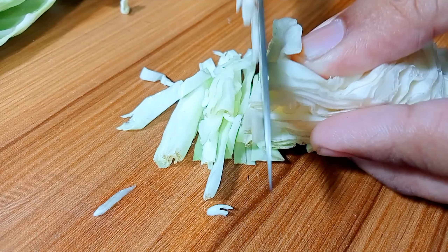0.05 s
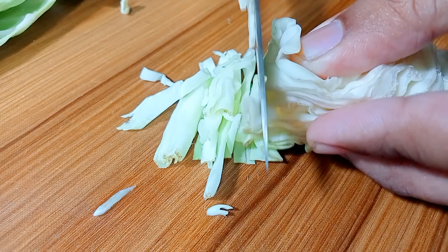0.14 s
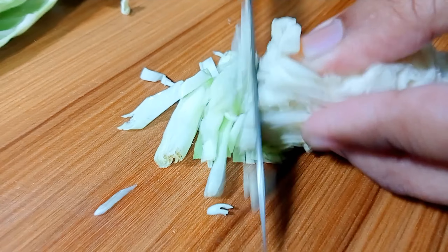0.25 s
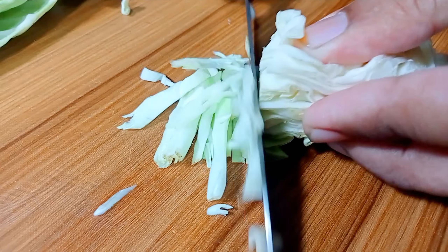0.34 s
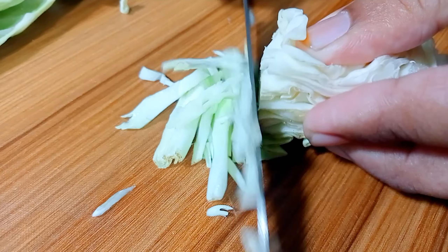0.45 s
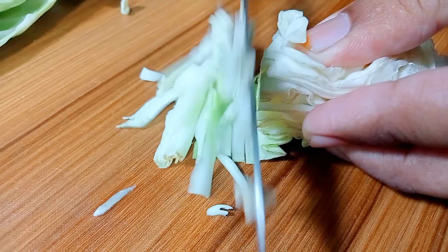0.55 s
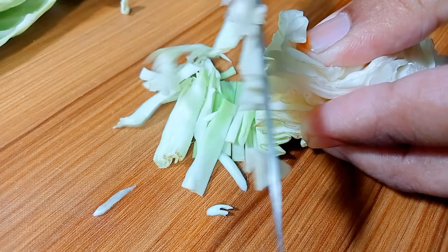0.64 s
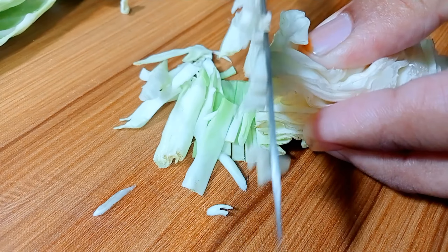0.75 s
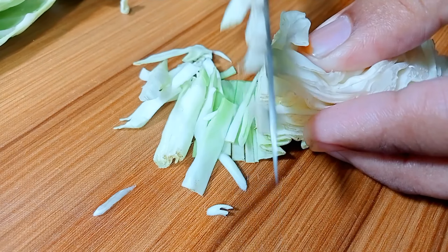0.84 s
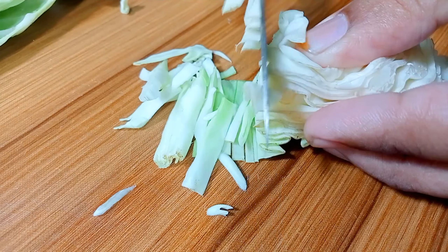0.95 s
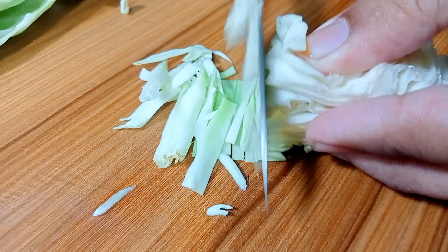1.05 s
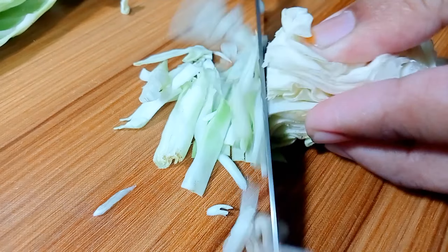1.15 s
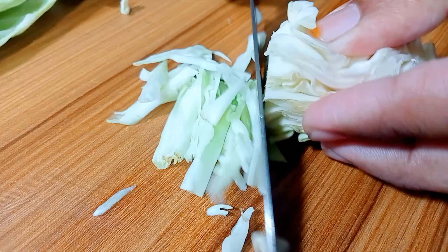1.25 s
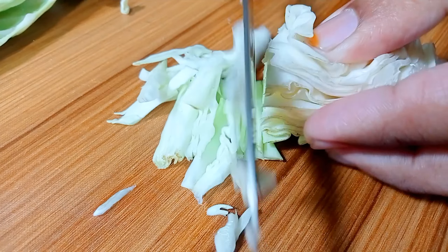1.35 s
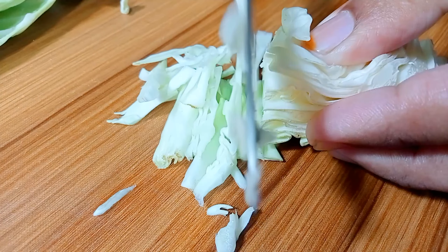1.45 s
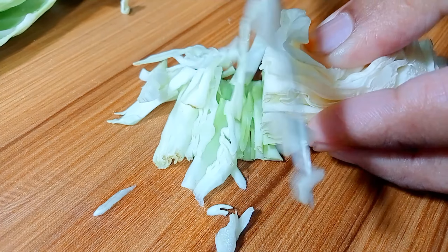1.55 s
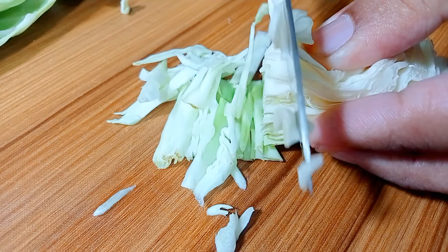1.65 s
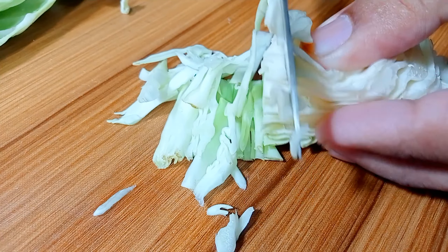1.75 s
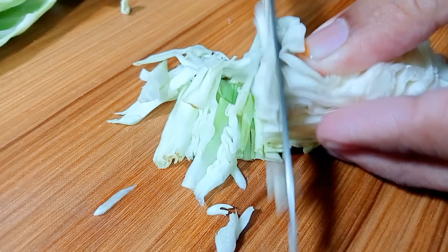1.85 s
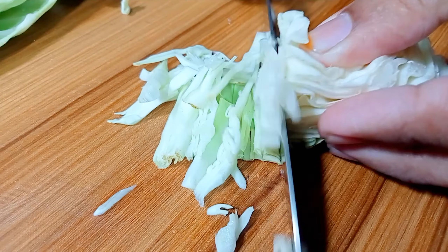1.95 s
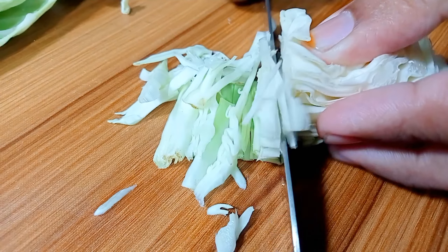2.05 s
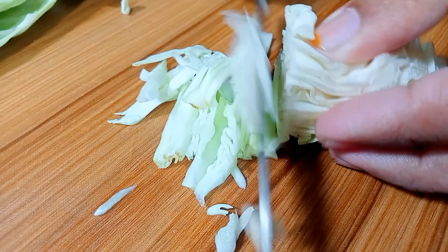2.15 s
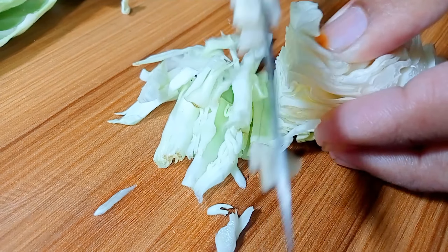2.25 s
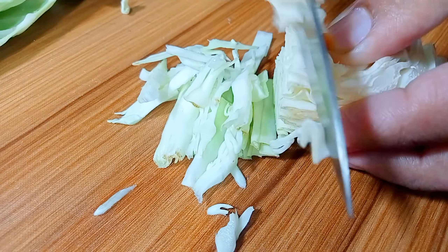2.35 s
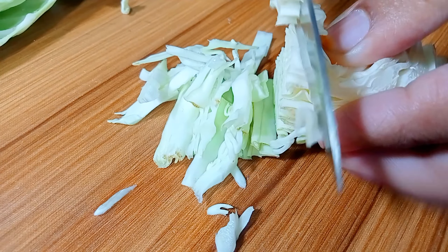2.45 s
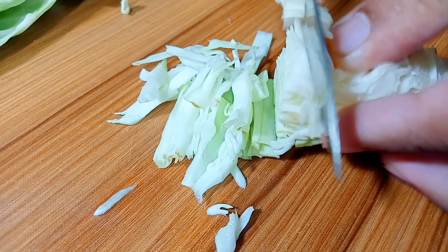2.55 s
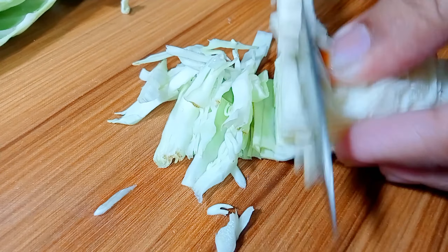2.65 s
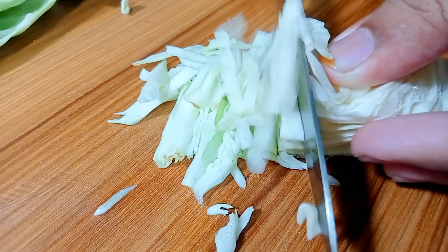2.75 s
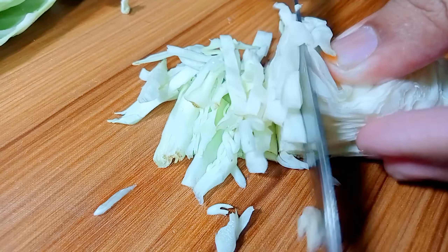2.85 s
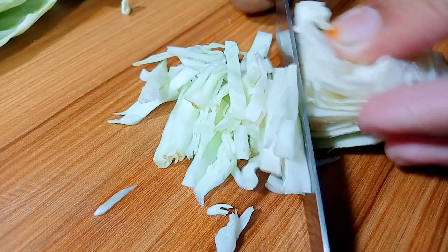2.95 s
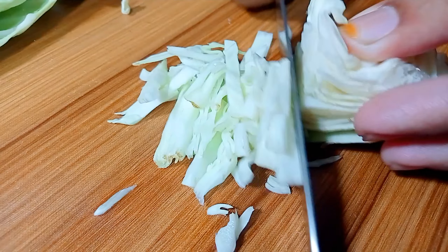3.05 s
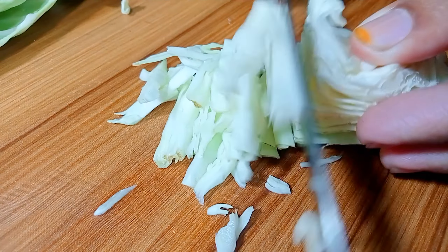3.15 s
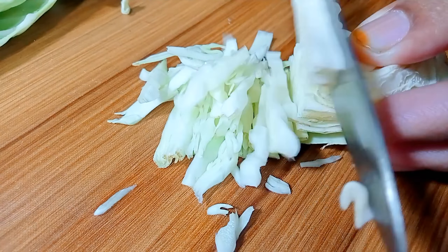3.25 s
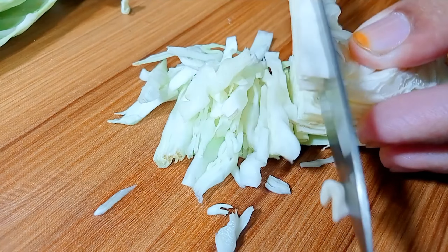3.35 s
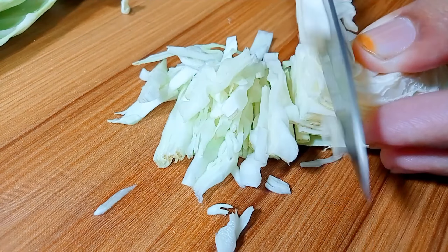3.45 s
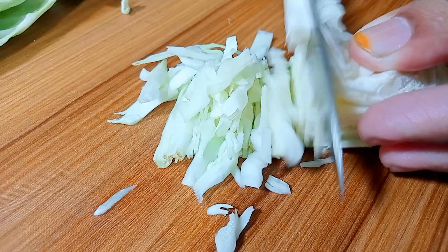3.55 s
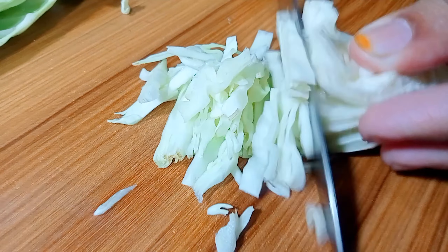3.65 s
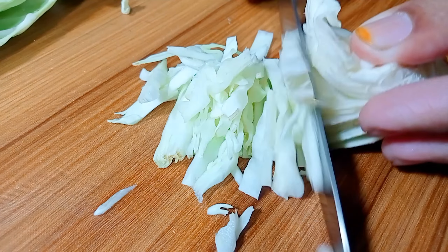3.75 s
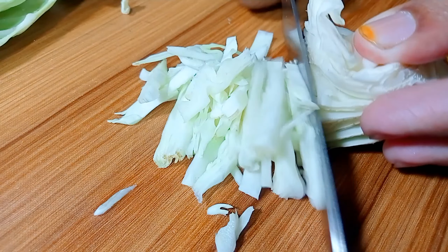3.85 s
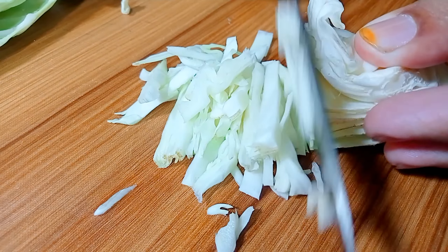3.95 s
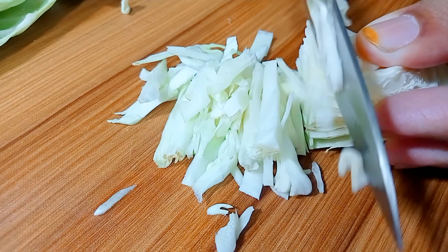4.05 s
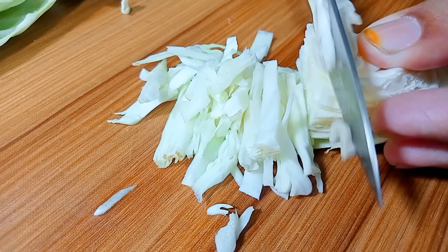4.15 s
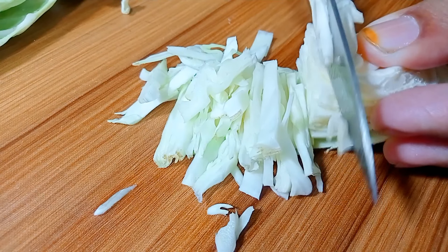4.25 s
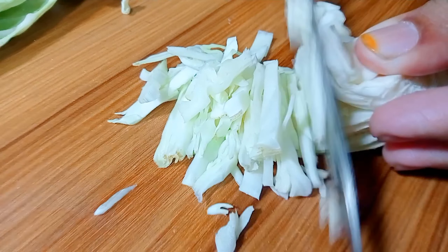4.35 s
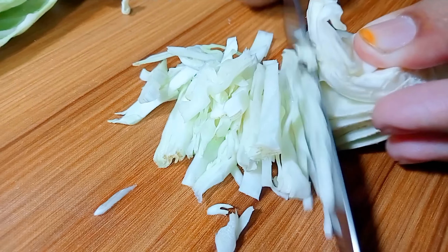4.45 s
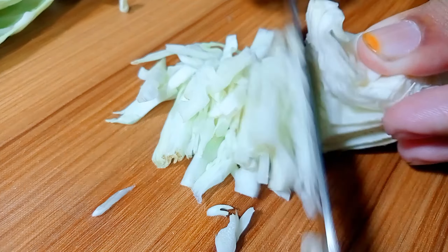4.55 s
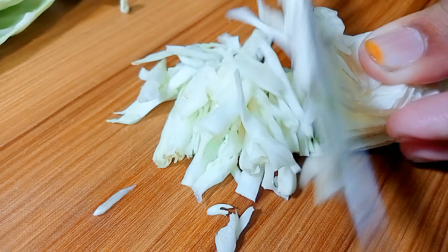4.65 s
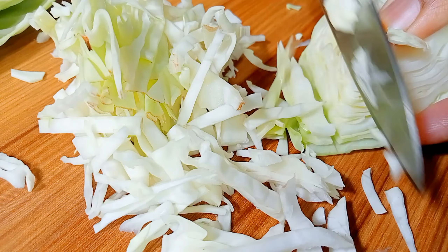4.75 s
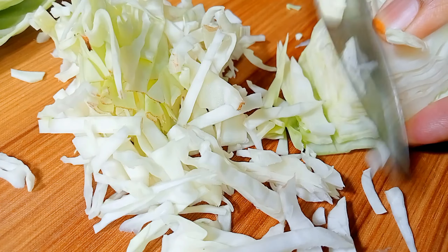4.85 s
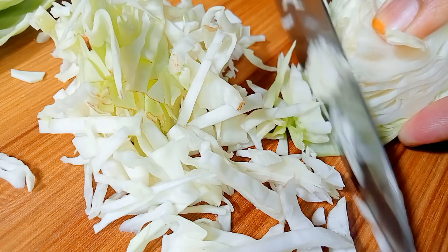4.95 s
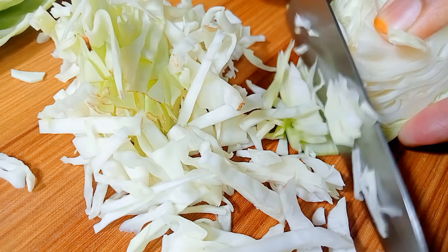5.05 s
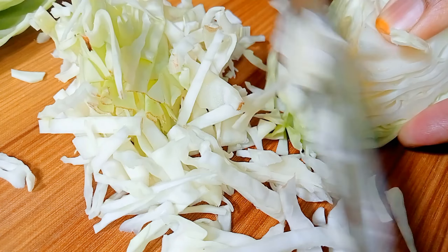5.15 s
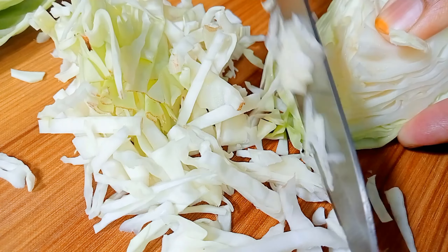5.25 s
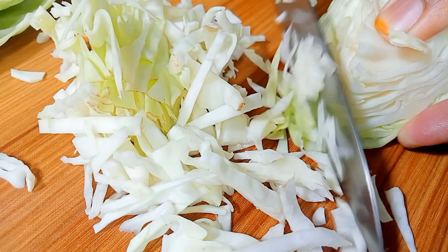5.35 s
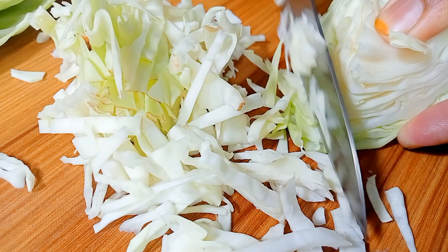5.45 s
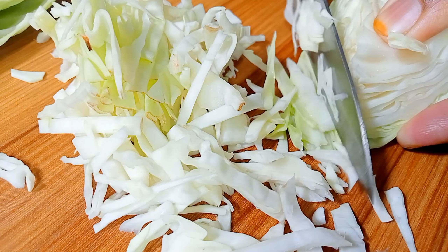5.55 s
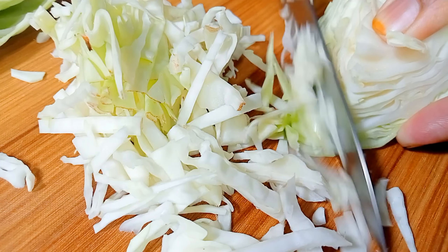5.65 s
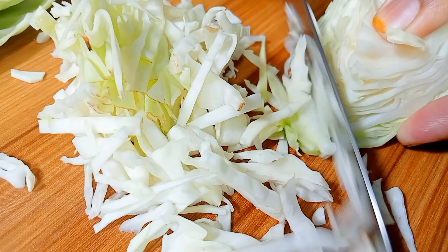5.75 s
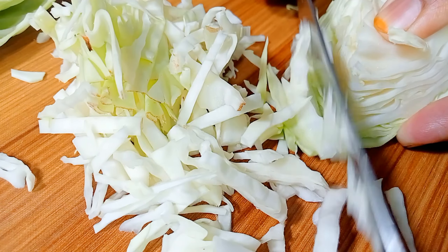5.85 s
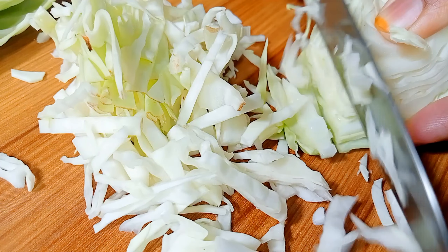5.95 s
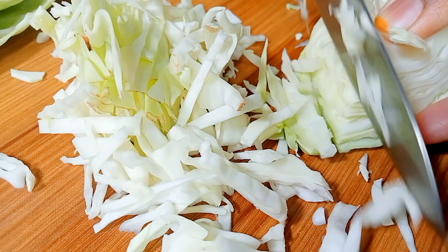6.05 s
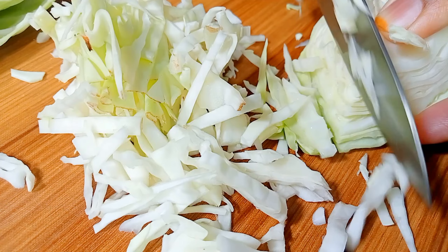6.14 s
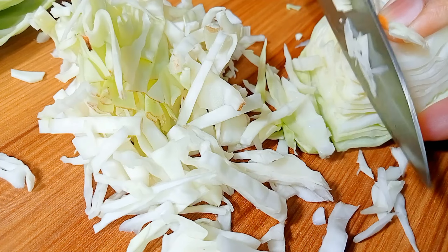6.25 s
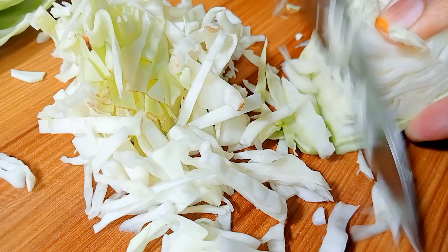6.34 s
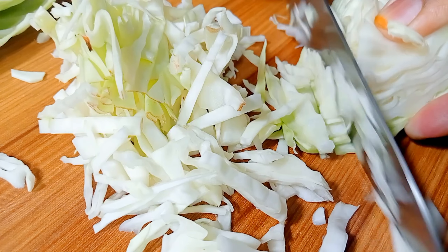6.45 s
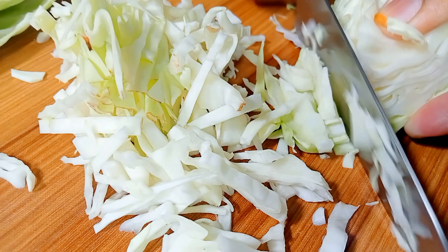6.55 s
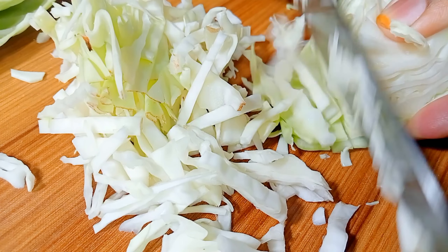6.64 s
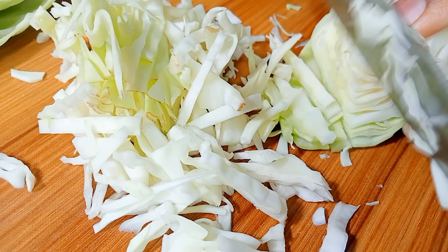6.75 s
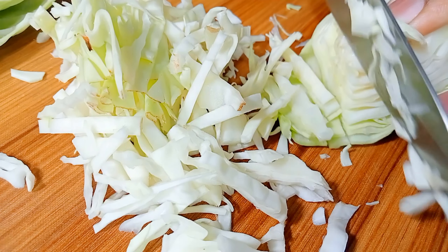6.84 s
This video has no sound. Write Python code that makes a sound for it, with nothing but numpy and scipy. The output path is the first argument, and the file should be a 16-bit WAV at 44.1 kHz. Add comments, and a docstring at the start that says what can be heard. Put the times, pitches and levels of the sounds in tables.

```python
"""In a small kitchen, close by, a knife shreds cabbage on a wooden board in eight strokes.
Each stroke crunches as a swarm of random fracture clicks, filtered into thud, push, crack and fizz.
Ribs snap as click runs, leaves rustle as sparse grains, and the wet blade squeaks by stick and slip.
Dull bumps of the cabbage and knocks of the edge are struck damped modes.
Synthetic room responses add reverberation, over faint wavering noise and one dry click."""
import sys
import numpy as np
from scipy import signal
from scipy.fft import rfft, irfft
from scipy.io import wavfile
from scipy.ndimage import uniform_filter1d

SR = 44100
rng = np.random.default_rng(int(sys.argv[2]) if len(sys.argv) > 2 else 0)


def master(y):
    """Save y as 16-bit WAV."""
    cut = np.clip(np.atleast_2d(y).T, -1, 1)
    pcm = np.round(cut * 32767)  # scale
    wavfile.write(sys.argv[1], SR, pcm.astype(np.int16))


N = 303849

# Levels marked rel_ are further scaled in the functions.
# Edge touches, bites, breaks the thickest rib, comes through; the third stroke sticks: three pushes.
# start_s, bite_delay_s, break_delay_s, length_s, rel_force_db, first_touch_db, board_weight_db,
# crispness_db, juice_db, rel_rib_snap_db, mean_leaf_pitch_hz
STROKES = [(0.6, 0.043, .064, 0.098, -23, -8, 2.5, 1, -1.2, -10, 3450),
           (1.411, 0.037, 0.098, 0.13, -22.5, -9.5, -1, 0.5, 0.1, 1.5, 3700),
           (2.197, 0.04, 0.085, .155, -30, -8, 3, 1.3, 0.6, -22.5, 3450),
           (2.413, 0.0031, 0.0071, 0.0098, -22.5, -10.5, 1.5, 4, 1, -6, 3460),
           (2.43, .007, .024, 0.038, -35.5, -13, 7, 9.5, 6, -19, 3320),
           (3.168, 0.012, .0755, 0.092, -22.5, -13.5, -2.5, 0.5, -1.9, -6.5, 3603),
           (3.88, 0.043, .0855, 0.097, -25, -9, 0.5, 3.1, -1.5, 0, 3420),
           (5.197, 0.0036, 0.0051, 0.028, -20.5, -8.5, 0, -4, -2, -6, 3390),
           (5.863, 0.046, 0.076, 0.11, -22, -11.5, -2.5, 0.6, 0.5, -4.5, 3300),
           (6.586, 0.033, 0.041, 0.079, -24.5, -8.5, -2, -2.5, -3, -9, 3250)]
# Force response of each crunch part: bite_db, growth_to_break_db, fall_after_break_db
THUD_FORCE = (-1.3, -2.5, -6.5)
PUSH_FORCE = (0, -1.1, -6.5)
CRACK_FORCE = (-1.2, 4.7, -8)
FIZZ_FORCE = (-9, 4.7, -5)
# Spectrum of the board's low thud: freq_hz, rel_density_db_per_hz
THUD_SPECTRUM = [(25, -31.5), (50, -12.5), (80, 0), (120, 1), (220, -5), (330, -19.5), (700, -45.5)]
# Spectrum of the push on the board: freq_hz, rel_density_db_per_hz
PUSH_SPECTRUM = [(60, -28.5), (200, -12.5), (320, 5), (420, 4), (560, 4.5), (720, -6), (860, -14),
                 (1200, -21), (2600, -67)]
# Spectrum of cracking leaf: freq_hz, rel_density_db_per_hz
CRACK_SPECTRUM = [(470, -42.5), (800, -13), (981, -3), (1050, -8), (1700, -10), (1920, -6), (2150, -8),
                  (2890, -1), (3600, -0.5), (4590, -15.5), (5200, -27.5), (6760, -51), (11400, -120)]
# Spectrum of bursting cells: freq_hz, rel_density_db_per_hz
FIZZ_SPECTRUM = [(2650, -52.5), (4500, -22.5), (5180, -15), (5870, -4.5), (6950, 1.5), (8270, -7),
                 (11000, -15), (12700, -15.5), (14900, -4.5), (15900, -23), (16500, -55)]
# Low board modes that the push keeps ringing: freq_hz, rel_level_db, t60_s
PLANK_MODES = [(150.15, -6, 0.46), (190, -5.5, 0.3), (282, -7.5, .14), (321, -7, 0.12), (544, -5.5, 0.0083),
               (700, -1, 0.093)]
# Single ribs and shreds snapping: start_s, rel_level_db
SNAPS = [(0.361, -36.5), (.600, -25), (0.755, -30), (0.7694, -18), (.783, -19), (0.7966, -17),
         (0.8625, -18), (0.87, -18.5), (1.386, -31.5), (1.455, -8), (1.685, -26.5), (1.722, -30.5),
         (2.3303, -5), (3.18, -9.5), (3.387, -28), (3.4313, -22), (3.908, -13), (3.9143, -11), (3.9287, -3),
         (4.1388, -25.5), (4.559, -33), (4.631, -34.5), (5.7954, -33), (6.595, -21)]
# Modes of a snapping rib: pitch_factor, rel_level_db, t60_s
RIB_MODES = [(.55, -28, .003), (.86, -15, .005), (1.03, 6, .006), (2.0, -2.5, .003), (2.25, -10, .003),
             (2.9, -21, .002), (4.3, -14, .002)]
# Blade and fingers brushing leaves: centre_s, half_length_s (to 1/e), rel_push_db, rel_crackle_db
BRUSHES = [(1.307, 0.021, -50.5, -56), (1.397, 0.011, -40, -44), (2.135, 0.027, -39, -47.5),
           (2.903, 0.012, -55.5, -53.5), (2.954, 0.025, -56, -54.5), (3.103, 0.021, -50, -43),
           (3.15, 0.013, -50, -46), (3.434, .005, -44, -39.5), (4.636, 0.025, -50.5, -59.5),
           (4.898, 0.011, -49.5, -42), (5.093, 0.023, -57, -50), (5.188, 0.01, -31, -35.5),
           (5.355, .02, -52, -50.5)]
# Wet steel on leaves, one table a squeak: time_s, mean_slips_per_s, rel_level_db
SQUEAKS = [
    [(.41, 620, -55), (.42, 600, -51.5), (.46, 630, -50.5), (.47, 700, -52), (.49, 550, -51),
     (.528, 370, -54), (.545, 38, -52)],
    [(4.318, 310, -49), (4.333, 298, -53), (4.35, 290, -45.5), (4.385, 282, -56)],
    [(6.40, 148, -64), (6.437, 137, -48.5), (6.48, 147, -40), (6.525, 118, -52)],
]
# Modes excited by each squeak: freq_hz, rel_level_db, t60_s
SQUEAK_MODES = [
    [(1340, -1, 0.0048), (1900, -3.5, 0.0053), (2490, -6.5, .008)],
    [(298, 1, 0.011), (1450, -8, 0.015), (2444, -8.5, 0.012), (2950, -7, 0.0045), (5850, -17, 0.01)],
    [(685, 19.5, 0.0029), (3050, 12, 0.0065), (3350, 9, 0.0091)],
]
# Cabbage giving way or bumping the board: start_s, rel_peak_db, ring_hz
BUMPS = [(.658, -7, 404), (1.421, -13.5, 532), (2.233, -11, 337), (3.152, -27, 339), (3.428, -24, 551),
         (5.169, -17.5, 453), (5.202, -6.5, 490), (5.914, -15.5, 700), (6.623, -6, 509),
         (6.819, -24.5, 850)]
# Modes of the bumped head: pitch_factor, rel_level_db, t60_s
HEAD_MODES = [(.35, -19.5, 0.023), (.8, -10, 0.015), (1.15, 5.5, 0.0051), (2.4, -4.5, 0.0043)]
# Edge landing on the board: start_s, peak_db (direct), hardness_db_per_octave, rel_room_db
KNOCKS = [(0.694, -11, 11, -8), (1.5409, -1.5, 1, -10.5), (2.455, -1.5, 5.5, -3), (3.2657, 0, 2, -10),
          (3.9733, -2, 1, -9.5), (5.22, -9.5, 1.5, -3), (5.96, -1.5, 1.5, -12), (6.660, 1, 5.5, -10.5)]
# Modes of board and blade together: freq_hz, rel_level_db, t60_s
BOARD_MODES = [(159, -28, 0.1), (464, -9.5, 0.01), (532, -13, 0.015), (1150, -31, .008), (1580, 5, 0.0079),
               (1870, -9, 0.018), (2520, -6, 0.0096), (2870, -2.5, 0.0039), (7100, -22, 0.0047)]
# Room colour for knocks: freq_hz, rel_room_db
KNOCK_ROOM = [(150, -4.5), (500, -5), (900, 1.5), (1550, -4.5), (2000, -0.5), (3200, 4.5), (4500, -3),
              (12000, -0.5)]
# Room colour for cabbage sounds: freq_hz, room_db
CABBAGE_ROOM = [(70, -9.5), (160, -7.5), (400, -13.5), (800, -11.5), (1500, -4), (2600, -9.5), (3700, -16),
                (7000, -11.5), (15000, -12.5)]
# Kitchen decay: freq_hz, t60_s
ROOM_T60 = [(100, 0.5), (500, 0.44), (2000, 0.45), (15000, 0.4)]
# Background noise spectrum: freq_hz, rel_density_db_per_hz
FLOOR_SPECTRUM = [(25, -24), (65, 0), (150, -13), (450, -15), (1250, -25), (3700, -23.5), (5100, -41),
                  (7000, -33), (11000, -40.5), (15500, -43.5)]
# Earlier stroke still ringing in the room: start_s, tail_peak_db
EARLIER_STROKE = (-0.038, -28.5)
# Short click without room: centre_s, dull_db, sharp_db
DRY_CLICK = (4.6905, -30, -31)

SLACK_SHARE, SLACK_DB = 0.5, -3.5  # slackening after the outer leaf splits, on the way to the bite
CREAK_DB = -11.5  # soft creaking leads into each stroke and lingers briefly after it
LEAF_RING_WIDTH_HZ = 280
SNAP_JUICE_DB, SNAP_PUSH_DB = -17, -16  # a snap also spits juice and jolts the board
FLOOR_DB = -62
BAND_LIMIT_HZ = 15800


def crunch(ring_share=0.4, cell_share=0.55):
    """Fractures push on the board, crack the leaf and burst sprays of small cells."""
    starts_s, *_, weight_db, crisp_db, juice_db, _, leaf_hz = np.transpose(STROKES)
    thud_gain = pressure(THUD_FORCE, weight_db)
    push_gain = pressure(PUSH_FORCE, np.zeros(len(STROKES)))
    crack_gain = pressure(CRACK_FORCE, crisp_db)
    fizz_gain = pressure(FIZZ_FORCE, juice_db)

    cracks = fractures(per_s=1000, spread_db=4)
    cells = fractures(per_s=6000, spread_db=3)
    # leaf after leaf: clumps a few ms long
    clumps = evened(amp(2.8 * drift(size=110)))
    drive = clumps * (np.sqrt(1 - cell_share) * cracks + np.sqrt(cell_share) * cells)

    low = through(cells * thud_gain, click(THUD_SPECTRUM))
    low = low + through(cracks * push_gain, click(PUSH_SPECTRUM))
    low = low + amp(-48) * through(low, ring(PLANK_MODES, size=12000))

    # pitch wanders as the edge passes from leaf to leaf
    pitch_hz = np.interp(np.arange(N) / SR, starts_s, leaf_hz) * (1 + 0.09 * drift(size=900))
    ringing = resonate(clumps * cells * crack_gain, pitch_hz, LEAF_RING_WIDTH_HZ)
    band = signal.butter(2, [2300, 4400], "band", fs=SR, output="sos")
    ringing = signal.sosfilt(band, ringing)
    dry_crack = through(drive * crack_gain, click(CRACK_SPECTRUM))
    crack = np.sqrt(1 - ring_share) * dry_crack + np.sqrt(ring_share) * ringing
    fizz = through(drive * fizz_gain, click(FIZZ_SPECTRUM))
    return low + crack + fizz


def pressure(shape, offsets_db, size=130, lead_size=1100):
    """Gain of one crunch part: rises to the bite, changes to the break, falls away."""
    bite_db, growth_db, fall_db = shape
    gain = np.zeros(N)
    for stroke, offset_db in zip(STROKES, offsets_db):
        start_s, bite_s, break_s, length_s, force_db, touch_db, *_ = stroke
        t = np.arange(N) / SR - start_s
        stages_s = np.sort([0, SLACK_SHARE * bite_s, bite_s, break_s, length_s])
        levels_db = [touch_db, touch_db / 2 + SLACK_DB, 0, growth_db, growth_db + fall_db]
        swell_db = np.interp(t, stages_s, levels_db)
        active = (t >= 0) * (t <= length_s)
        gain += amp(force_db + offset_db + bite_db + swell_db) * active
    lead = uniform_filter1d(uniform_filter1d(gain, lead_size), lead_size)
    return np.maximum(uniform_filter1d(gain, size), amp(CREAK_DB) * lead)


def fractures(per_s, spread_db, size=600):
    """Clicks of very uneven strength; the steady blade keeps their running power near 1."""
    strength = amp(spread_db * np.minimum(rng.exponential(1, N), 4)) * rng.choice([-1, 1], N)
    clicks = strength * (rng.random(N) < per_s / SR)
    power = uniform_filter1d(uniform_filter1d(clicks ** 2, size), size)
    return clicks / np.sqrt(abs(power) + 1e-4)


def snaps(size=400):
    """A rib breaks in a brief run of clicks; the thicker it is, the louder and longer it tears."""
    out, t = np.zeros(N), np.arange(size) / SR
    stroke_ribs = [(s + break_s, rib_db) for s, _, break_s, *_, rib_db, _ in STROKES]
    ribs = stroke_ribs + list(SNAPS)
    spill = amp(SNAP_JUICE_DB) * click(FIZZ_SPECTRUM) + amp(SNAP_PUSH_DB) * click(PUSH_SPECTRUM)
    for (start_s, db), tear in zip(ribs, rng.standard_normal((len(ribs), size))):
        pitch_hz = 3330 * (1 + 0.023 * tear[0])  # no two ribs ring quite alike
        u = t / (0.00029 + 0.00065 * amp(db))
        run = tear * u ** 2 * np.exp(-u)
        sound = np.convolve(run, ring(RIB_MODES, pitch_hz))
        add(out, start_s, amp(db + 9) * sound / np.linalg.norm(sound))
        add(out, start_s, amp(db + 7.5) * np.convolve(run / np.linalg.norm(run), spill))
    return out


def brushes():
    """Light touches break only a few cells; loose shreds tick as they settle."""
    t = np.arange(N) / SR
    push_gain, crackle_gain = np.zeros((2, N))
    for centre_s, half_s, push_db, crackle_db in BRUSHES:
        touch = np.exp(-abs((t - centre_s) / half_s) ** 1.3)
        push_gain += amp(push_db) * touch
        crackle_gain += amp(crackle_db) * touch
    grains = fractures(per_s=2700, spread_db=5.5)
    tick_db = -60.5 + 4 * np.minimum(rng.exponential(1, N), 4)
    settling = amp(tick_db) * (rng.random(N) < 22 / SR)  # 22 ticks per s
    sharp = grains * crackle_gain + settling
    dull = grains * push_gain
    low = through(dull, click(THUD_SPECTRUM)) + through(dull, click(PUSH_SPECTRUM))
    crack = through(sharp, click(CRACK_SPECTRUM))
    return low + crack + amp(-2.5) * through(sharp, click(FIZZ_SPECTRUM))


def squeaks(scrape_size=130):
    """Stick and slip: slightly uneven jerks, each with a short scrape, ring blade and leaf."""
    out = np.zeros(N)
    for rows, modes in zip(SQUEAKS, SQUEAK_MODES):
        time_s, rate, db = np.transpose(rows)
        t = np.arange(time_s[0], time_s[-1], 1 / SR)
        per_s = np.interp(t, time_s, rate)
        per_s = per_s * np.exp(14 / per_s * drift(size=150)[:len(t)])  # slow slips are the least even
        slips = np.diff(np.floor(np.cumsum(per_s) / SR), prepend=0)
        uneven, grit = rng.standard_normal((2, N))[:, :len(t)]
        slips = slips * np.sqrt(SR / per_s) * amp(np.interp(t, time_s, db) + 0.79 * uneven)
        scrape = grit * np.sqrt(abs(uniform_filter1d(slips ** 2, scrape_size)))
        scrape_share = np.clip(110 / per_s, 0, 0.85)  # slow slips slide far, fast ones ring clean
        drive = np.sqrt(1 - scrape_share) * slips + np.sqrt(scrape_share) * scrape
        body = ring(modes)
        juice = signal.fftconvolve(scrape, click(FIZZ_SPECTRUM))
        add(out, time_s[0], signal.fftconvolve(drive, body / np.linalg.norm(body)))
        add(out, time_s[0], amp(-16.5) * juice)
    return out


def bumps():
    """Dull blows of cabbage on board excite damped modes of the head."""
    out = np.zeros(N)
    for start_s, db, ring_hz in BUMPS:
        add(out, start_s, amp(db - 2) * ring(HEAD_MODES, ring_hz))
    return out


def knocks():
    """The edge hits the board, which radiates into the whole kitchen."""
    out = np.zeros(N)
    for start_s, peak_db, hardness_db, room_db in KNOCKS:
        blow = amp(peak_db) * ring(BOARD_MODES, tilt_db=hardness_db)
        add(out, start_s, blow)
        add(out, start_s, amp(room_db + 4) * signal.fftconvolve(blow, kitchen(KNOCK_ROOM)))
        add(out, start_s + 0.00057, amp(-12) * blow)  # off the counter top
        add(out, start_s + 0.0029, amp(-12.5) * blow)  # off the wall behind it
    return out


def reverberation(x, count=4):
    """Hand and blade move between strokes: the sound takes turns through several room responses."""
    starts_s = [s for s, *_ in STROKES]
    turn = np.searchsorted(starts_s, np.arange(N) / SR) % count
    return sum(through(x * (turn == k), kitchen(CABBAGE_ROOM)) for k in range(count))


def kitchen(colour, count=1600, size=20):
    """Room response: sparse taps of random sign, each band dying at its own speed."""
    taps = np.zeros(count * size)
    places = np.arange(5, count) * size + rng.integers(0, size, count - 5)
    taps[places] = rng.choice([-1., 1.], count - 5)
    hz, t, z = signal.stft(taps, SR, nperseg=512)
    z = z * amp(-60 * t / read(ROOM_T60, hz)[:, None])
    pair = np.array([z, z * amp(read(colour, hz))[:, None]])
    plain, coloured = signal.istft(pair, SR, nperseg=512)[1]
    return coloured / np.linalg.norm(plain)


def background():
    """Quiet background noise whose level wavers slowly, the tail of an earlier stroke, and one dry click."""
    out = amp(FLOOR_DB + 1.4 * drift(size=7000)) * noise(FLOOR_SPECTRUM)

    start_s, tail_db = EARLIER_STROKE
    stroke = click(THUD_SPECTRUM) + click(CRACK_SPECTRUM)
    stroke = stroke + amp(-4) * click(PUSH_SPECTRUM) + amp(-8.5) * click(FIZZ_SPECTRUM)
    tail = signal.fftconvolve(stroke, kitchen(CABBAGE_ROOM))
    add(out, 0, amp(tail_db) * tail[round(-start_s * SR):] / abs(tail).max())

    centre_s, dull_db, sharp_db = DRY_CLICK
    burst = np.exp(-((np.arange(N) / SR - centre_s) / 0.0021) ** 2)
    dull = amp(dull_db) * noise(PUSH_SPECTRUM)
    sharp = amp(sharp_db) * (noise(CRACK_SPECTRUM) + amp(-5.5) * noise(FIZZ_SPECTRUM))
    return out + burst * (dull + sharp)


def amp(db):
    """Decibels to gain."""
    return 10 ** (np.asarray(db) / 20)


def evened(x):
    """Scales to rms 1."""
    return x / np.sqrt(np.mean(x ** 2) + 1e-20)


def read(points, hz):
    """Reads a table on a log-frequency axis."""
    f, value = np.transpose(points)
    return np.interp(np.log(hz + 1), np.log(f + 1), value)


def add(mix, start_s, sound):
    """Mixes a sound in at start_s."""
    part = mix[max(round(start_s * SR), 0):][:len(sound)]
    part += sound[:len(part)]


def noise(colour):
    """Steady noise of a given spectrum, rms 1."""
    gain = amp(read(colour, np.fft.rfftfreq(N, 1 / SR)))
    return evened(irfft(rfft(rng.standard_normal(N)) * gain, N))


def click(colour, size=4096):
    """Causal minimum-phase click of a given spectrum, energy 1."""
    level_db = np.maximum(read(colour, abs(np.fft.fftfreq(size, 1 / SR))), -100)
    spectrum = np.exp(np.conj(signal.hilbert(np.log(amp(level_db)))))
    pulse = np.fft.ifft(spectrum).real[:size // 2]
    return pulse / np.linalg.norm(pulse)


def ring(modes, factor=1, tilt_db=0, size=4096):
    """Damped modes struck once, peak 1; tilt favours high ones, soft contact rounds the start."""
    t = np.arange(size) / SR
    sound = np.zeros(size)
    for hz, db, t60_s in modes:
        envelope = amp(db + tilt_db * np.log2(hz) - 60 * t / t60_s)
        sound += envelope * np.sin(2 * np.pi * hz * factor * t)
    sound = sound * (1 - np.exp(-t / 0.00016))
    return -sound / abs(sound).max()


def resonate(x, hz, width_hz):
    """A resonance that follows the curve hz and keeps the power of white noise."""
    turn = np.exp(2j * np.pi * np.cumsum(hz) / SR)
    r = np.exp(-np.pi * width_hz / SR)
    return (turn * signal.lfilter([np.sqrt(2 * (1 - r * r))], [1, -r], x / turn)).real


def drift(size):
    """Smooth chance, rms 1, that changes over size samples."""
    return evened(uniform_filter1d(uniform_filter1d(rng.standard_normal(N), size), size))


def through(x, response):
    """Plays x through an impulse response."""
    return signal.oaconvolve(x, response)[:N]


def scene():
    """Cabbage and board close by, with the kitchen behind them."""
    cabbage = crunch() + snaps() + brushes() + squeaks() + bumps()
    return (cabbage + reverberation(cabbage) + knocks() + background())[None]


def record(dry):
    """The microphone drops the deepest bass, the tallest peaks are rounded off; then the band limit."""
    high_pass = signal.butter(5, 66, "high", fs=SR, output="sos")
    thin = signal.sosfilt(high_pass, dry)
    rounded = thin / (1 + (thin / 0.9) ** 6) ** (1 / 6)
    low_pass = signal.firwin(511, BAND_LIMIT_HZ, window=("kaiser", 9), fs=SR)
    return signal.oaconvolve(rounded, low_pass[None], "same")


dry = scene()
out = record(dry)
master(out)
```